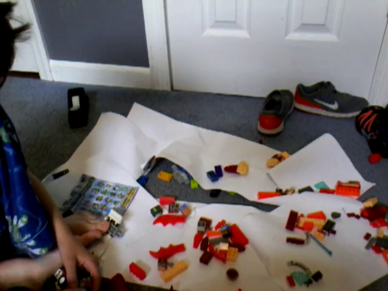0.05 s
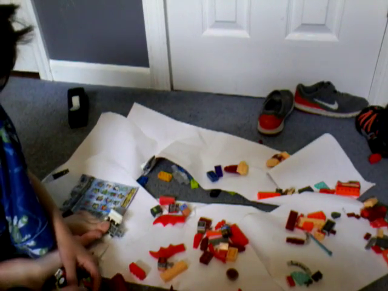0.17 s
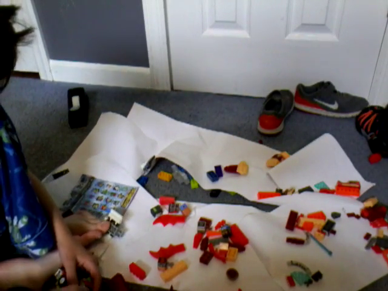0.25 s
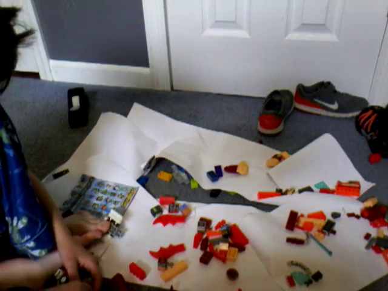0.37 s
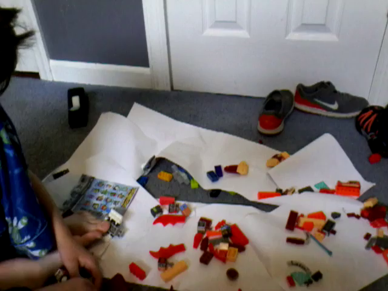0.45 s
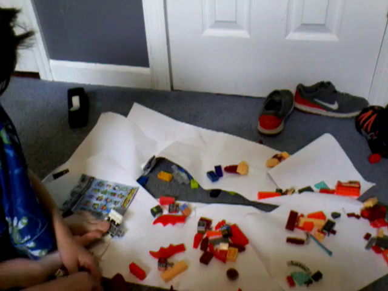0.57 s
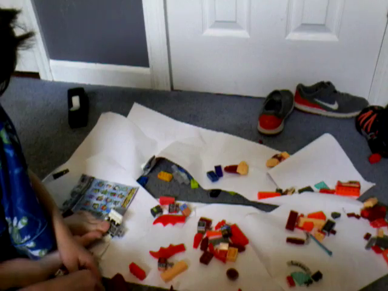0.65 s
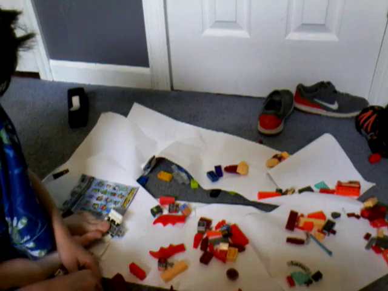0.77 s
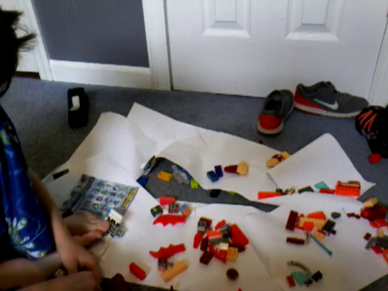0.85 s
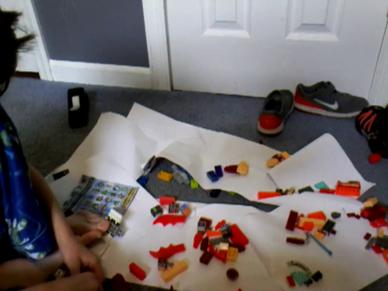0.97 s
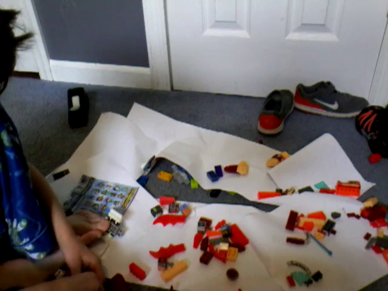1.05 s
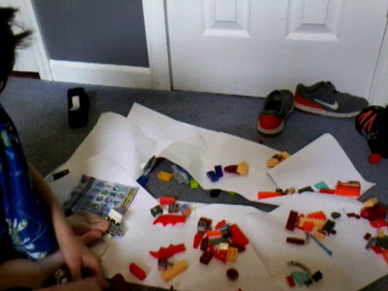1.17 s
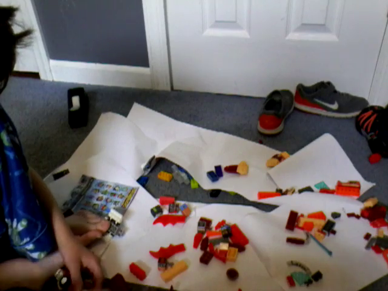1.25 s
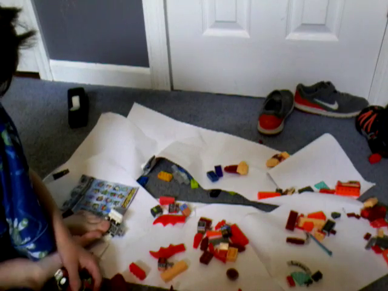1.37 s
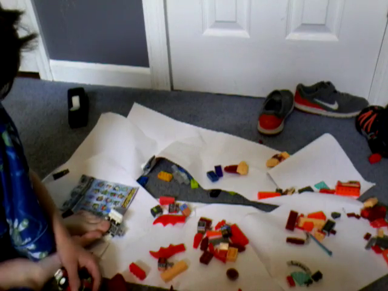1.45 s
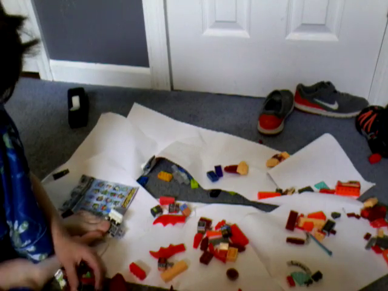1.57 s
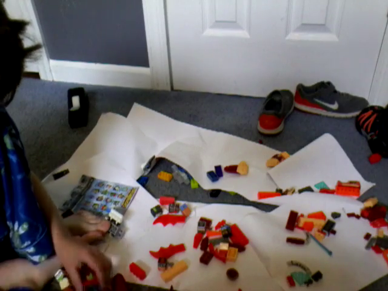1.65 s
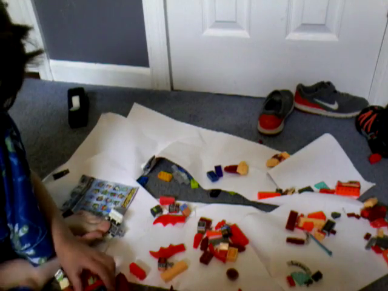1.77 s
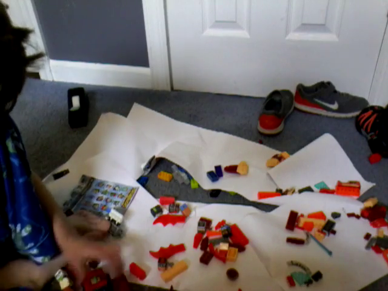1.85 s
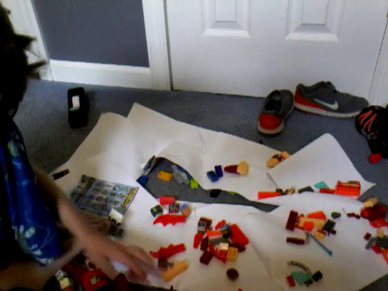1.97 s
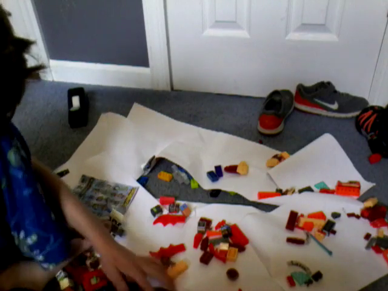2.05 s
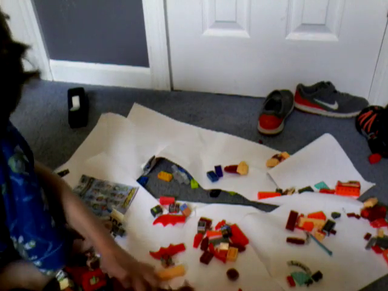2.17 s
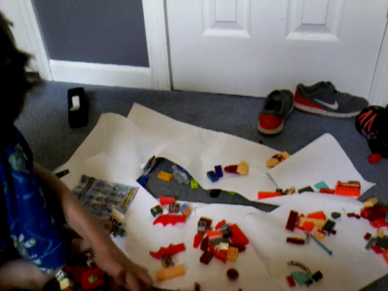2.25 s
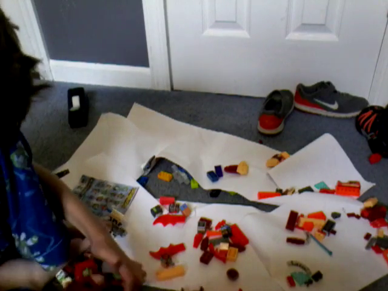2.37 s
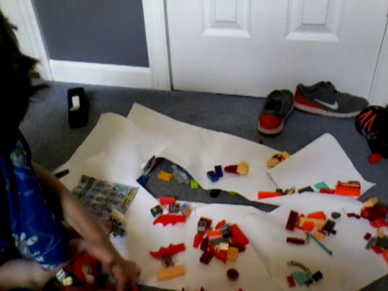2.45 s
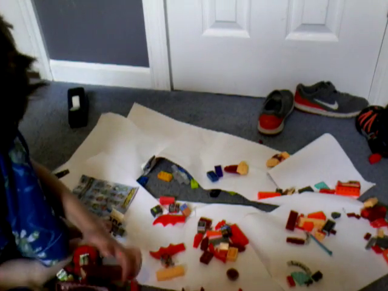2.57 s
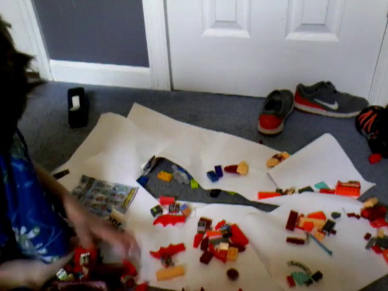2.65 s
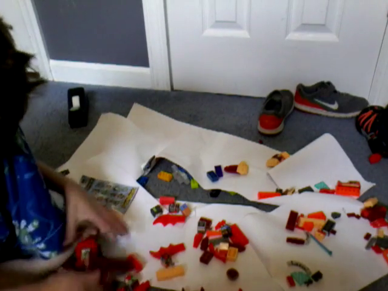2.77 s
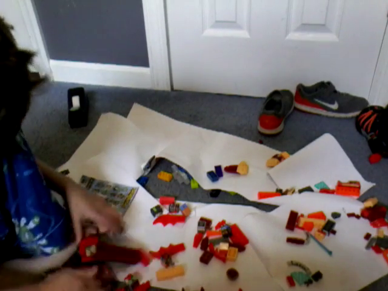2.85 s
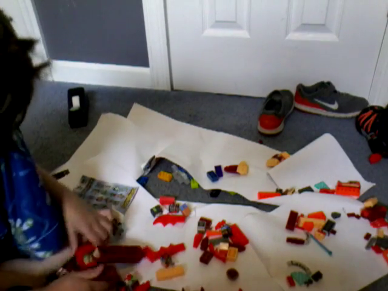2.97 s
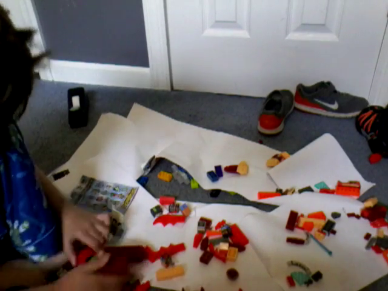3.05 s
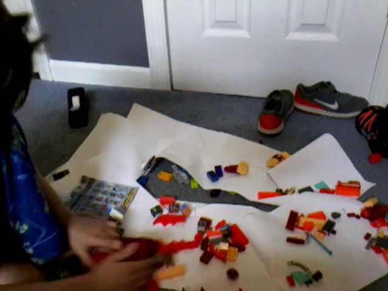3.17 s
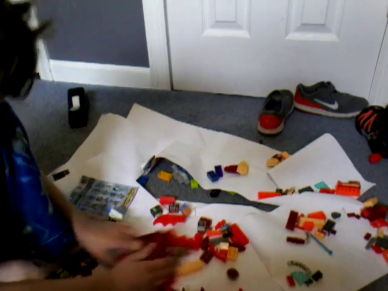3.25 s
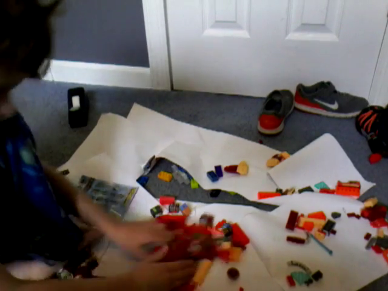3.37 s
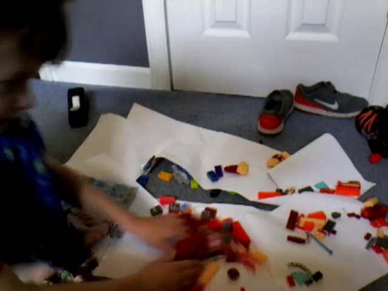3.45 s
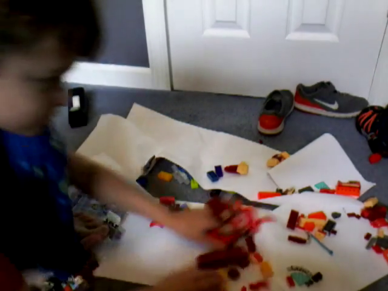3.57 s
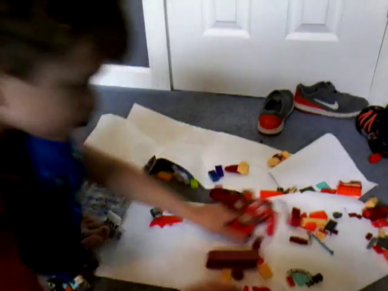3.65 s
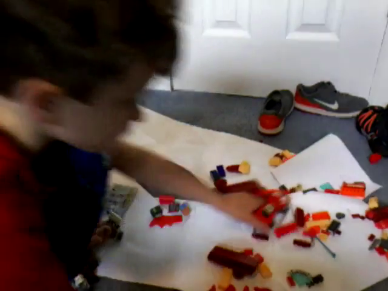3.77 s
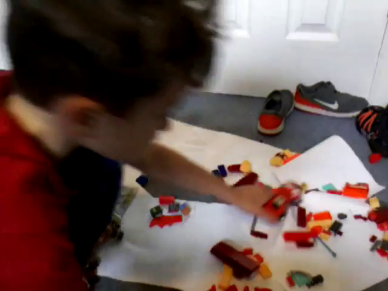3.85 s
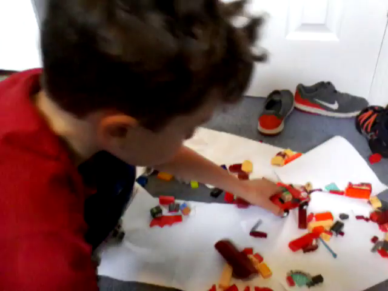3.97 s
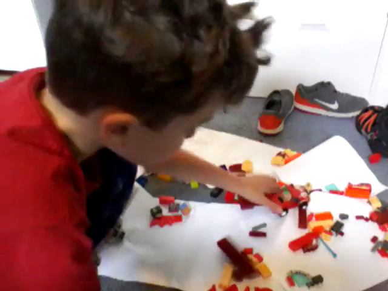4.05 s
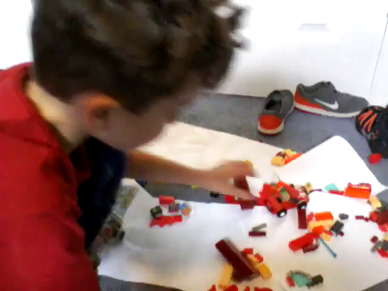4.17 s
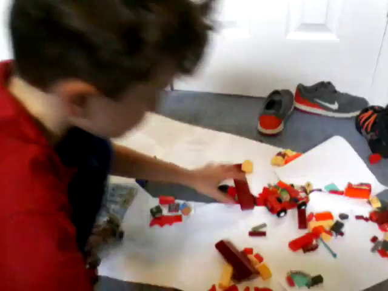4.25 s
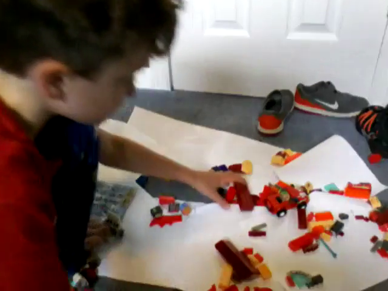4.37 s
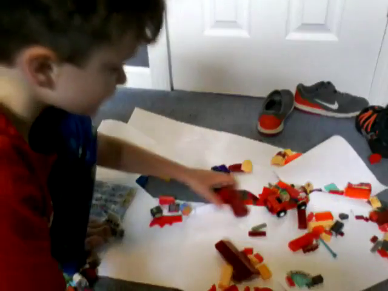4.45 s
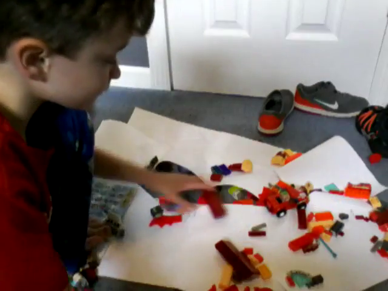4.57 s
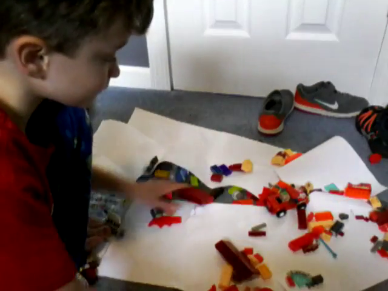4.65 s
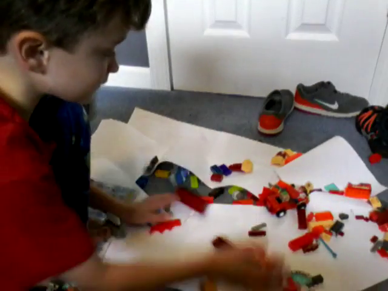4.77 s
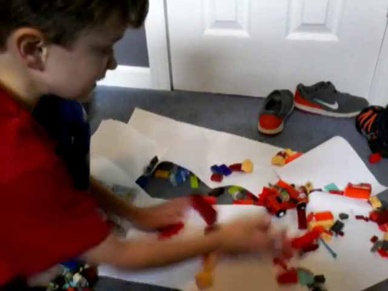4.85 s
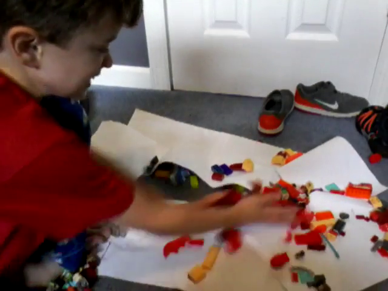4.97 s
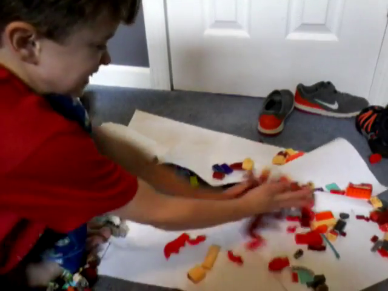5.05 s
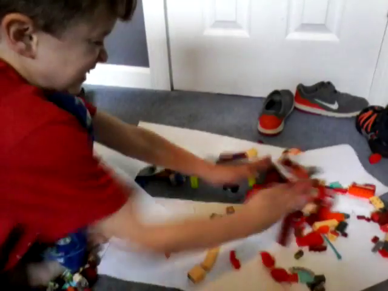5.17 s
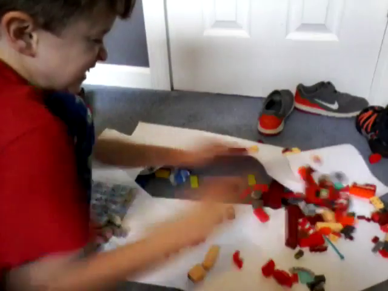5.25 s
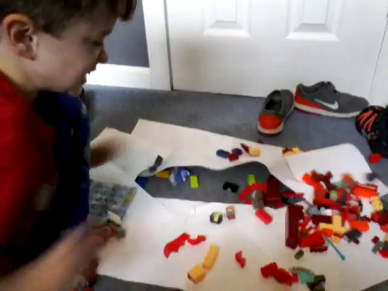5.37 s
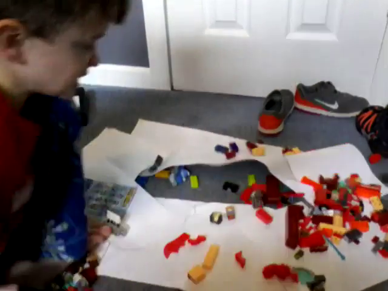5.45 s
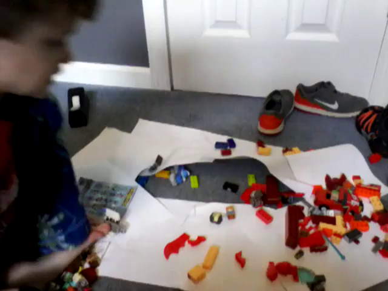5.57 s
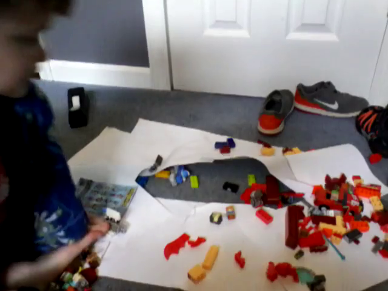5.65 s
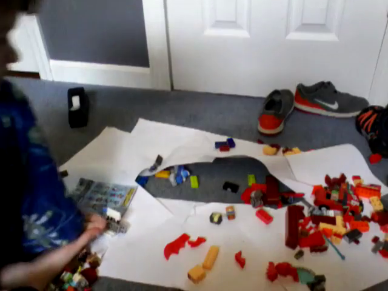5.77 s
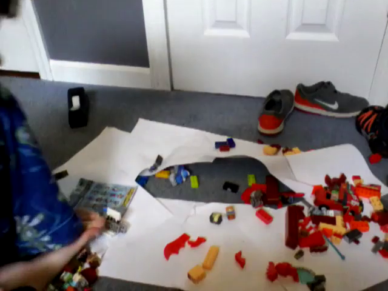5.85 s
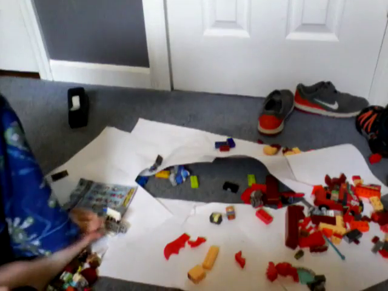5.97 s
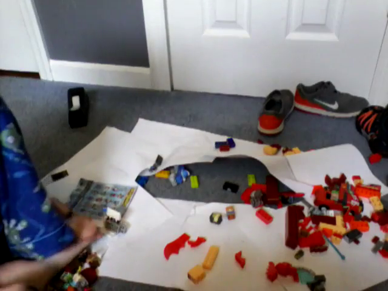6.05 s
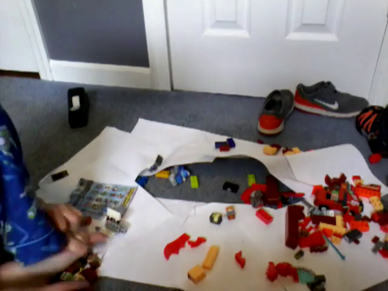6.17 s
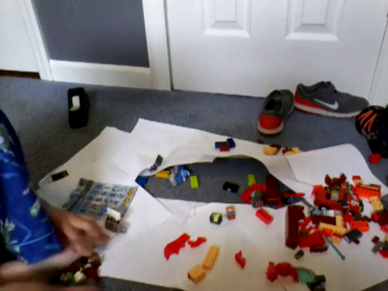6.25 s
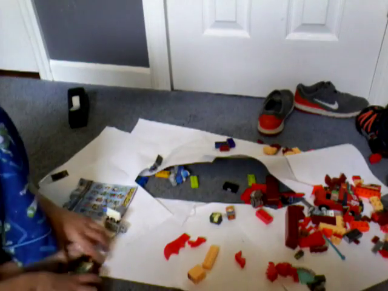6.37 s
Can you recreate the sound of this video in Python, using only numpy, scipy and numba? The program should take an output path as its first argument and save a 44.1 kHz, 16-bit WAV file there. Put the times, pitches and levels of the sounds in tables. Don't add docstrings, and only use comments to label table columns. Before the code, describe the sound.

In a small furnished bedroom, a faint low hum and slight paper rustle, with one sharp plastic click at about one second. Then a hand digs into a heap of small hollow plastic bricks, raking, pushing and scooping them over paper on carpet in dense, bright, uneven clatter for nearly four seconds. It thins into scattered soft ticks and small taps. Close, cheap little microphone, strong upper mids, little bass.

```python
import sys
import numpy as np
from scipy import signal
from scipy.fft import rfft, irfft
from scipy.io import wavfile
from scipy.ndimage import uniform_filter1d, minimum_filter1d
from numba import njit

SR = 44100
rng = np.random.default_rng(int(sys.argv[2]) if len(sys.argv) > 2 else 0)


def amplitude_ratio(level_db):
    exponent = np.asarray(level_db, float) / 20
    return 10 ** exponent


def store_pcm(level_fs):
    pcm = np.round(np.clip(level_fs, -1, 1) * 32767).astype(np.int16)
    wavfile.write(sys.argv[1], SR, np.atleast_2d(pcm).T)


N = 282681


def unit(x):
    return x / np.sqrt(np.mean(x ** 2))


def curves(table):
    s, *columns = np.transpose(table)
    return [np.interp(np.arange(N) / SR, s, column) for column in columns]


def shape_db(points, hz):
    f, db = np.transpose(points)
    return np.interp(np.log(np.maximum(hz, 1)), np.log(f), db)


def coloured(x, points):
    gain = amplitude_ratio(shape_db(points, np.fft.rfftfreq(len(x), 1 / SR)))
    return unit(irfft(rfft(x) * gain, len(x)))


def walk(rate_hz):
    hold = int(SR / rate_hz)
    steps = np.repeat(rng.standard_normal(N // hold + 1), hold)
    return uniform_filter1d(uniform_filter1d(steps, hold), hold)[:N]


@njit
def ring(start, hz, t60_s, size, rise_s):
    out, rise = np.zeros(N), np.exp(-1 / (rise_s * SR))
    for k in range(len(start)):
        turn = np.exp(2j * np.pi * hz[k] / SR - np.log(1000) / (t60_s[k] * SR))
        z, unpushed = size[k] + 0j, 1.
        for i in range(int(start[k]), min(N, int(start[k] + .7 * t60_s[k] * SR))):
            out[i] += z.imag * (1 - unpushed) ** 2
            z, unpushed = z * turn, unpushed * rise
    return out


# mode_hz, width_hz, level_db
BRICK_MODES = [(1782, 40, 5.5), (2500, 120, -13), (2873, 40, 10), (3300, 77, 7), (3830, 320, 5.5),
               (4420, 110, 11.5), (5020, 72, 6), (6380, 130, 1.5), (6700, 120, 2.5), (7150, 110, 5.5),
               (8316, 98, 7)]
# freq_hz, density_db_per_hz
TICK_SHAPE = [(300, -52), (500, -39.5), (1500, -30), (1800, -19), (2600, -10), (2900, -7.5), (4300, -3.5),
              (5500, -3.5), (7200, -13.5), (9200, -20), (12000, -22), (15000, -35)]
LONG_IN_S, LONG_OUT_S, LONG_IN_DB, LONG_AWAY_DB = 1.74, 2.95, 4, -10
GRIP_DB, GRIP_UNTIL_S = 20, 1.685
DEEP_RING_DB_PER_OCTAVE = 2.5
SPREAD_S = .0003


def contacts(s, db, bright_db, low_db, own_hz, own_db, tick_db, scatter_db, rise_s, low_hz, count, size):
    pick = rng.integers(len(BRICK_MODES), size=(len(s), count))
    pick[::3, 0], pick[1::7, 0] = 0, 2
    mode_hz, mode_width_hz, mode_db = np.transpose(BRICK_MODES)[:, pick]
    long_here = (s > LONG_IN_S) & (s < LONG_OUT_S)
    mode_db = mode_db + (pick == 0) * np.where(long_here, LONG_IN_DB, LONG_AWAY_DB)[:, None]
    mode_db -= GRIP_DB * (s < GRIP_UNTIL_S)[:, None]
    chance = rng.standard_normal((len(s), 3, count + size))

    spread_hz = np.geomspace(low_hz, 14000, size) / 2 + np.linspace(low_hz, 14000, size) / 2
    spread_hz = spread_hz + 0 * s[:, None]
    mode_detune = np.where(pick % 2 + pick // 3, .04, .012)
    detune = np.c_[mode_detune, 0 * spread_hz + 1.2 / size]
    hz = np.c_[mode_hz, spread_hz] * (1 + detune * chance[:, 0])
    hz = np.clip(hz, 300, .4 * SR)

    gain_db = np.c_[mode_db, 0 * spread_hz + tick_db]
    gain_db = gain_db + scatter_db * chance[:, 2] + shape_db(TICK_SHAPE, hz)
    gain_db += bright_db[:, None] * np.clip(np.log2(hz / 5000) / .5, 0, 1)
    gain_db += low_db[:, None] * np.clip(np.log2(3200 / hz) / 1.24, 0, 1)
    own_gain_db = gain_db.max(axis=1) + own_db + DEEP_RING_DB_PER_OCTAVE * np.log2(4000 / own_hz)

    width_hz = np.c_[mode_width_hz, 180 + .06 * spread_hz] * amplitude_ratio(2.5 * chance[:, 1])
    width_hz = np.c_[width_hz, 65 + .03 * own_hz]
    hz = np.c_[hz, own_hz]
    swing = amplitude_ratio(np.c_[gain_db, own_gain_db]) * width_hz * np.sign(rng.standard_normal(hz.shape))
    swing *= (amplitude_ratio(db) / np.sqrt(np.sum(swing ** 2, axis=1)))[:, None]
    start = (s[:, None] + SPREAD_S * rng.exponential(size=hz.shape)) * SR
    t60_s = np.log(1000) / np.pi / width_hz
    return ring(start.ravel(), hz.ravel(), t60_s.ravel(), swing.ravel(), rise_s)


# start_s, peak_db, ring_hz, bright_db, thud_db
TAPS = [(0.543, -26, 4300, -22, -14), (1.0662, 0.5, 4860, -12.5, -26), (1.0664, -23, 520, -42, 1),
        (1.0668, -10, 7400, -21, -25), (1.504, -27.5, 5200, -19, -19), (1.521, -20.5, 583, -34, 9.5),
        (1.629, -19.5, 4230, -34, 0), (1.668, -18, 3250, -46, -21), (5.566, -19, 4200, -46, -22),
        (5.633, -19, 3800, -29, 17), (5.677, -20, 4740, -23, 15), (5.72, -23.5, 5900, -13, -22),
        (5.814, -25, 4520, -16, 10), (5.825, -23.5, 6600, -15.5, -17.5), (6.157, -37, 4500, -22.5, -28),
        (6.218, -19.5, 5760, -12, -14), (6.274, -30, 2510, -23, 14), (6.309, -23, 3930, -20, 12),
        (6.327, -23, 4400, -9, -24), (6.344, -21, 4640, -6, -37), (6.375, -27, 4660, -27, -25.5),
        (6.388, -22, 6700, -28, -21), (6.404, -23, 4340, -27.5, -18)]
# start_s, peak_db, ring_hz, bright_db
RAKE_KNOCKS = [(1.6896, -11.5, 2900, -18.5), (1.7032, -8.5, 4230, -21), (1.7522, -12, 4230, -21),
               (1.7604, -12.5, 1760, -6), (1.788, -15, 1750, -26), (1.774, -6.5, 4320, -38),
               (1.8021, -4.5, 3980, -19), (1.9112, -27.5, 4530, 2), (2.0253, -25.5, 3830, 0),
               (2.0572, -4.5, 3500, -37), (2.0901, -2.5, 4360, -40), (2.0945, -4, 1896, -31),
               (2.1008, -2, 4150, -3), (2.122, -1, 4570, -21), (2.1836, 2, 4190, -26),
               (2.2353, -1, 3820, -37), (2.2539, 4, 3840, -22), (2.3337, -2, 4540, -26.5),
               (2.3518, -1, 3830, -35), (2.3643, 4.5, 3760, -20), (2.382, -2.5, 3900, -20.5),
               (2.4053, 2, 4167, -16.5), (2.506, -6.5, 4300, -36), (2.5293, -2, 4130, -20),
               (2.553, -0.5, 3030, -17), (2.6202, -1.5, 4160, -18), (2.689, -2.5, 3830, -18),
               (2.7911, -11, 3860, -13), (2.826, -10.5, 3370, -20), (2.879, -12, 4600, -31),
               (2.892, -2.5, 4400, -21), (2.9298, -6.5, 3700, -14.5)]
# start_s, peak_db, ring_hz, bright_db
PUSH_KNOCKS = [(3.0087, -1.5, 8140, 1), (3.042, -8.5, 4120, -32), (3.0869, -3.5, 2940, -46),
               (3.1245, -3.5, 4180, -42), (3.16, -7, 4520, -22), (3.1836, -2.5, 4140, -19),
               (3.211, -6, 4620, -13), (3.24, -6, 5230, -16), (3.279, -3.5, 4500, -7.5),
               (3.3377, -6, 4370, -28), (3.3611, 0.5, 4260, -28), (3.4, -4.5, 3980, -15),
               (3.415, 4, 4750, -5), (3.4489, 4.5, 6120, -21), (3.4722, 2.5, 6840, -9),
               (3.492, 3.5, 4220, 29), (3.52, 3, 4480, 9), (3.5621, 4, 4730, 18), (3.6399, 7, 4450, -34),
               (3.6646, -1.5, 4320, 7), (3.6779, 5.5, 4400, -7), (3.703, 1.5, 4080, -9),
               (3.7398, 3, 5600, -21), (3.7889, 3, 4280, -30), (3.8398, -4, 4340, -29),
               (3.8834, 4, 4510, 8), (3.9986, -4, 4280, -6), (4.103, -16, 4200, -3),
               (4.1585, -7, 4170, -49), (4.257, -14.5, 4460, 6)]
# start_s, peak_db, ring_hz, bright_db
SCOOP_KNOCKS = [(4.383, -4, 4500, -38), (4.3973, 1, 4450, -25), (4.5132, -4, 4400, -25),
                (4.5324, 2.5, 4440, -13.5), (4.577, 4, 4010, -9), (4.6518, -5, 6300, -18),
                (4.6737, -1, 4500, -22), (4.725, -9, 4630, -11), (4.7492, -1.5, 4400, -9),
                (4.7658, -6.5, 4580, -17), (4.779, 4, 4450, 9), (4.809, 2, 3920, -14),
                (4.8614, 8, 5020, -15.5), (4.8847, -2, 4300, -25.5), (4.925, 1, 4165, -38),
                (4.9684, 3, 4030, -30), (4.995, 1.5, 3700, -14), (5.034, 5, 3720, -14.5),
                (5.0726, 2, 3660, -18), (5.0973, 0, 4040, -27.5), (5.174, -3.5, 4080, -25.5),
                (5.203, -0.5, 3940, -18), (5.2706, -5, 3320, -33), (5.3299, 0.5, 3820, -5.5),
                (5.3377, -2, 3850, -14), (5.3885, -2, 4130, -14), (5.4774, -11.5, 4460, -14)]
THUD_DB, THUD_PER_DB, THUD_SCATTER_DB = -13.5, -1.3, 1
THUD_PER_DRAG = 0.18
HELD_DB, HELD_UNTIL_S = 8.0, 1.6


def knocks(drag_db):
    heap = np.array(RAKE_KNOCKS + PUSH_KNOCKS + SCOOP_KNOCKS)
    thud_db = THUD_DB + THUD_PER_DB * heap[:, 1] + THUD_SCATTER_DB * rng.standard_normal(len(heap))
    thud_db += THUD_PER_DRAG * (drag_db[(heap[:, 0] * SR).astype(int)] + 23)
    heap = np.c_[heap, thud_db] + [0, 3.0, 0, 0, 0]
    s, db, hz, bright_db, low_db = np.r_[TAPS, heap].T
    held_db = HELD_DB * (s < HELD_UNTIL_S)
    lags_s = np.cumsum(.0016 * amplitude_ratio(3.7 * rng.standard_normal((len(s), 2))), axis=1)
    out = contacts(s, db - 2.5, bright_db + 21.5, low_db + 17.0, hz, own_db=7.5,
                   tick_db=held_db[:, None] - 3.0, scatter_db=1.5, rise_s=.0001,
                   low_hz=560, count=2, size=36)
    for lag_s, softer_db in zip(lags_s.T, (8.0, 11.0)):
        out += contacts(s + lag_s, db - softer_db - held_db / 2, bright_db + 25.5, low_db + 29, hz,
                        own_db=-0.5 - held_db / 2, tick_db=2 * held_db[:, None] - 21.5,
                        scatter_db=5.0, rise_s=0.000069, low_hz=900, count=3, size=20)
    return out


# start_s, peak_db, ring_hz, bright_db
LESSER_TICKS = [(1.7108, -17, 4150, -20), (1.717, -15.5, 4100, -10), (1.7859, -9, 2910, -26),
                (1.8576, -34, 3850, -17), (1.8724, -38, 3830, -19), (1.9188, -30, 3700, -23),
                (1.927, -36, 4400, -26), (2.1362, -6, 3700, -2), (2.1651, -11.5, 6000, -15),
                (2.176, -6, 4500, -11), (2.1952, -3.5, 4400, -13), (2.2, -9.5, 4160, -30),
                (2.2113, -5.5, 4270, -16), (2.2623, 0.5, 3850, -25), (2.2705, -11.5, 4920, -26),
                (2.2777, -4.5, 3800, -26), (2.3122, -5, 3880, -21), (2.3224, -2.5, 3750, -29),
                (2.355, -4.5, 3720, -21), (2.4164, -0.5, 3680, -28), (2.4353, -8.5, 3450, -13),
                (2.4437, -10, 5000, -16), (2.4526, -12, 4800, -14), (2.4673, -18, 4800, -15),
                (2.48, -22, 4130, -23), (2.497, -4.5, 3250, -22), (2.5626, -6.5, 5130, -16),
                (2.5908, -22, 2880, -12), (2.639, -1.5, 5000, -43), (2.6733, -13, 5300, -25),
                (2.7274, -22, 3330, -20), (2.749, -21, 2850, -14), (2.761, -15.5, 3080, -15),
                (2.797, -12.5, 3220, -21), (2.805, -16, 3350, -29), (2.8417, -17, 3280, -28),
                (2.8997, -6, 3370, -26), (2.9473, -8.5, 3230, -20), (2.9694, -18.5, 3500, -24),
                (3.023, -13, 4140, -26), (3.0534, -13, 3600, -32), (3.1493, -15, 2800, -30),
                (3.1726, -12, 3700, -21), (3.218, -13, 3300, -19), (3.232, -19, 4460, -18),
                (3.267, -7.5, 3500, -21), (3.2895, -11, 4570, -14),
                (3.323, -14, 4400, -21), (3.372, -6, 4500, -12), (3.407, -7, 4230, -25),
              (3.4595, 1, 5600, -5), (3.528, -5, 4300, -1), (3.5351, -0.5, 4400, -18.5),
              (3.5434, -2.5, 4390, -18), (3.5723, -3, 4170, -4), (3.5857, 0.5, 4000, -12),
              (3.603, -4, 4040, 0), (3.6152, -1, 4230, -12), (3.6826, -5, 4400, -18),
              (3.727, -5.5, 4060, 3), (3.757, -1, 5860, -16), (3.799, -4, 4280, -3),
              (3.817, -5.5, 4130, -16), (3.829, -3, 4500, -23), (3.8546, -6.5, 2860, -13),
              (3.87, -8, 3730, -22), (3.9071, -7.5, 2070, -30), (3.926, -10, 4420, -5),
              (3.935, -5.5, 8530, 3), (3.9486, -7.5, 4130, -6), (3.9578, -8, 8480, -14),
              (3.967, -6, 4300, -19), (3.974, -14, 3600, -15), (4.02, -10.5, 3760, -23),
              (4.0312, -15.5, 1760, -21), (4.0461, -20, 3430, -24), (4.0557, -9, 6500, -31),
              (4.0648, -17.5, 3280, -19), (4.123, -14.5, 6030, -4), (4.1371, -15, 3170, -29),
              (4.2063, -40, 5070, -20), (4.2179, -26, 4500, -25), (4.2696, -18, 6250, -1),
              (4.2995, -28, 4410, -9), (4.3066, -30, 4300, -12), (4.3146, -26, 3120, -9),
              (4.326, -29, 4060, -20), (4.335, -21, 3600, -27), (4.3437, -19, 6400, 1),
              (4.4056, -29, 4200, -18.5), (4.446, -19, 4600, -27), (4.471, -21.5, 2730, -33),
              (4.4809, -27, 3000, -18), (4.5837, -1, 2850, -22), (4.6818, -10.5, 5080, -21.5),
                (4.6888, -15, 3500, -21), (4.7966, -8, 6270, -14), (4.8187, -0.5, 3850, -24),
               (4.8291, -3.5, 4040, -10.5), (4.8369, -1, 4160, -3), (4.8692, -9, 4870, -28),
               (4.894, 1, 4400, -7), (4.9352, -2, 4030, -21), (5.0855, 0.5, 2930, -16),
               (5.122, -6.5, 2880, -14), (5.1287, -12, 2960, -18), (5.1429, -12, 3760, -19),
               (5.161, -10, 4520, -20), (5.1873, -11, 4300, -26), (5.2223, -19, 4000, -20),
               (5.236, -14, 3300, -21), (5.263, -17, 4120, -31), (5.282, -9, 4070, -29),
               (5.2971, -9, 3630, -13), (5.3217, -5.5, 3120, -23), (5.3434, -3, 6400, -23),
               (5.366, -3.5, 6560, -13), (5.3744, -1.5, 4470, -23), (5.4103, -10, 4500, -18),
               (5.4228, -8, 6160, -17), (5.4346, -12, 4300, -20), (5.4556, -30, 4300, -17),
               (5.465, -26, 3560, -9), (5.4994, -11.5, 5020, -10), (5.5126, -20, 4970, -17),
               (5.5233, -20, 5070, -23), (5.5357, -32, 5550, -14), (5.5762, -23.5, 4950, -22),
               (5.586, -27, 3860, -24), (5.6048, -36, 4850, -21), (5.61, -32, 4130, -19),
               (5.6186, -31, 4170, -19), (5.6467, -27, 2680, -20), (5.665, -25, 3730, -11),
               (5.6848, -36, 4830, -14), (5.735, -31, 6000, -22), (5.745, -35, 5960, -15),
               (5.762, -32, 4200, -18), (5.7776, -30, 3960, -23), (5.847, -41, 4600, -20),
               (5.862, -47.5, 2630, -19.5), (5.8727, -50, 2740, -17.5)]


def ticks(low_db):
    s, db, hz, bright_db = np.array(LESSER_TICKS).T
    low_db = low_db[(s * SR).astype(int)]
    rebound_s = s + .002 * amplitude_ratio(3.5 * rng.standard_normal(len(s)))
    first = contacts(s, db + 2.5, bright_db + 21.0, low_db + 15.5, hz, own_db=4.5, tick_db=-4.5,
                     scatter_db=3.0, rise_s=.0001, low_hz=1043, count=2, size=20)
    second = contacts(rebound_s, db - 2.5, bright_db + 24.0, low_db + 17.5, hz, own_db=8.7, tick_db=-4.5,
                      scatter_db=4.8, rise_s=.0001, low_hz=1300, count=2, size=10)
    return first + second


# start_s, clatter_db, drag_db
GRAB = [
    (1.6, -47.5, -15),
    (1.71, -31, -29),
    (1.74, -36, -21),
    (1.773, -8, -65),
    (1.81, -22.5, -28),
    (1.98, -65, 2),
]
# start_s, clatter_db, drag_db
RAKE = [
    (2.061, -31, -19),
    (2.108, -7.5, -22.5),
    (2.18, -11.5, -25),
    (2.28, -5.5, -29),
    (2.42, -11.5, -29.5),
    (2.59, -10.5, -27),
    (2.78, -26, -20),
    (2.91, -21, -16),
    (3.0, -33.5, -7.5),
]
# start_s, clatter_db, drag_db
PUSH = [
    (3.04, -29, -14.5),
    (3.25, -18.5, -13.5),
    (3.44, -19, -15.5),
    (3.49, -9.5, -21),
    (3.66, -8, -20.5),
    (3.78, -12.5, -16),
    (4.02, -14.5, -18.5),
    (4.12, -36, -3),
    (4.23, -35, -11.5),
]
# start_s, clatter_db, drag_db
SCOOP = [
    (4.399, -32, 5.5),
    (4.479, -22.5, -22),
    (4.71, -21, -14),
    (4.78, -14.5, -35.5),
    (4.839, -12, -15.5),
    (5.001, -6.5, -27.5),
    (5.43, -13, -15.5),
    (5.59, -29, -14),
    (5.98, -56, -9),
]
# start_s, clatter_db, drag_db
IDLE = [
    (0.0, -54.5, -13),
    (0.9, -72, -7.5),
    (1.1, -50.5, -4),
    (1.25, -55.5, -19),
    (4.372, -29, -11),
    (6.15, -48.5, -15),
    (6.41, -32.5, -16.5),
]


def hand():
    return curves(sorted(IDLE + GRAB + RAKE + PUSH + SCOOP))


JOLT_DB, JOLT_T60_S = -13.5, 0.11


def jolted(db):
    s, knock_db = np.array(RAKE_KNOCKS + PUSH_KNOCKS + SCOOP_KNOCKS)[:, :2].T
    power = np.zeros(N)
    power[(s * SR).astype(int)] = amplitude_ratio(2 * (knock_db + JOLT_DB))
    power = signal.lfilter([1], [1, -amplitude_ratio(-120 / JOLT_T60_S / SR)], power)
    return 10 * np.log10(power + amplitude_ratio(2 * db))


BUNCH_DB = 2.4
RAREST = .008


def clatter(db, bright_db, low_db, per_s=1500):
    chance = rng.random((int(per_s * N / SR), 3))
    s = chance[:, 0] * (N - 1) / SR
    at = (s * SR).astype(int)
    size_db = db[at] - 2.32 * np.log(chance[:, 1] + RAREST) + BUNCH_DB * walk(45)[at] - 7.0
    own_hz = 2600 * 2.357 ** chance[:, 2]
    return contacts(s, size_db, bright_db[at] + 13.0, low_db[at] + 23.0, own_hz, own_db=-3.6,
                    tick_db=-4.0, scatter_db=3.7, rise_s=.0001, low_hz=1500, count=2, size=6)


# freq_hz, density_db_per_hz
PAPER_SHAPE = [(71, -46), (120, -8.5), (396, -1), (729, -2), (1030, -1.5), (1380, 0), (2500, -1.5),
               (3250, -40), (5500, -120)]


def paper(db):
    crackle = rng.standard_normal(N) * amplitude_ratio(4.0 * walk(150) + 1.5 * walk(28))
    return amplitude_ratio(db - 2.5) * coloured(crackle, PAPER_SHAPE)


ROOM_T60_S, ROOM_DULL_T60_S, ROOM_DB = .2, .21, -4


def room(x, count=8):
    t, out = np.arange(int(.4 * SR)) / SR, np.zeros(N + SR)
    for part in np.array_split(np.arange(N), count):
        noise = rng.standard_normal(len(t))
        dull = signal.lfilter(*signal.butter(2, 5500, fs=SR), noise)
        tail = dull * amplitude_ratio(-60 * t / ROOM_DULL_T60_S) + (noise - dull) * amplitude_ratio(-60 * t / ROOM_T60_S)
        tail *= np.clip((t - .002) / 0.00052, 0, 1)
        tail /= np.sqrt(np.sum(tail ** 2))
        out[part[0]:part[-1] + len(t)] += signal.fftconvolve(x[part], tail)
    return out[:N] * amplitude_ratio(ROOM_DB)


# freq_hz, density_db_per_hz
AIR_SHAPE = [(22, -39), (107, -0.5), (148, -10), (240, -7.5), (297, -4), (537, -17.5), (2700, -31),
             (8810, -34.5), (13900, -31), (15500, -42.5)]
AIR_DB = -52
HUM_HZ, HUM_DB, OCTAVE_DB = 147, -63, -61
LOAD_S, LOAD_RISE_S, LOAD_HUM_DB, LOAD_OCTAVE_DB, LOAD_RUMBLE_DB = 1.0, .1, 11, 2, 2


def house():
    load = .5 + .5 * np.tanh((np.arange(N) / SR - LOAD_S) / LOAD_RISE_S)
    air = coloured(rng.standard_normal(N), AIR_SHAPE)
    bass = signal.lfilter(*signal.butter(1, 450, fs=SR), air)
    air = air + bass * (amplitude_ratio(LOAD_RUMBLE_DB * load + 1.1 * walk(4.8)) - 1)
    phase = 2 * np.pi * np.cumsum(HUM_HZ * (1 + 0.012 * walk(5.5))) / SR
    hum = amplitude_ratio(HUM_DB + LOAD_HUM_DB * load + 1.5 * walk(9.1)) * np.sin(phase)
    hum += amplitude_ratio(OCTAVE_DB + LOAD_OCTAVE_DB * load + 3.6 * walk(22)) * np.sin(2 * phase)
    return amplitude_ratio(AIR_DB) * air + hum


BRIGHT_DB, BRIGHT_PER_DRAG = -5.5, 0.16
BIG_DB, BIG_PER_DB = -16.5, -0.03


def scene():
    db, drag_db = hand()
    big_db = BIG_DB + BIG_PER_DB * (db + 23.5)
    heap = clatter(jolted(db), BRIGHT_DB + BRIGHT_PER_DRAG * (drag_db + 16.5), big_db)
    bricks = knocks(drag_db) + ticks(big_db) + heap
    bricks = signal.lfilter(*signal.butter(4, 400, "high", fs=SR), bricks)
    near = bricks + paper(db + drag_db)
    return (near + room(near) + house())[None]


# freq_hz, floor_db
WEAK_FLOOR = [(60, -19.5), (230, -21), (450, -23), (1300, -22), (1800, -42), (9000, -33), (10000, -18),
              (12000, -16.5), (14200, -17.5), (14900, 0)]


def drop_weak_lines(x, size=1024, count=16):
    lead = 2 * size - 725
    n, k = np.arange(2 * size), np.arange(size)
    basis = np.cos(np.pi / size * np.outer(n + .5 + size / 2, k + .5)) * np.sqrt(2 / size)
    basis *= signal.windows.kaiser_bessel_derived(2 * size, 4 * np.pi)[:, None]
    hops = np.pad(x, (lead, 3 * size - (lead + N) % size)).reshape(-1, size)
    lines = np.c_[hops[:-1], hops[1:]] @ basis
    hz = (k + .5) * SR / 2 / size

    mids = np.sqrt(np.mean(lines[:, (hz > 2500) & (hz < 6000)] ** 2, axis=1))
    mids = np.exp(uniform_filter1d(np.log(mids + 1e-9), size=7, origin=1))
    own = .5 * (hz > 600)
    near = np.sqrt(own * lines ** 2 + (1 - own) * uniform_filter1d(lines ** 2, size=9, axis=1))
    luck_db = np.repeat(rng.standard_normal((len(lines), size // count)), count, axis=1)
    luck_db = luck_db * np.clip(hz / 2000, 1.5, 4.5)
    keep = near > mids[:, None] * amplitude_ratio(shape_db(WEAK_FLOOR, hz) + luck_db)

    power = np.mean(hops.reshape(len(hops), 8, -1) ** 2, axis=2).ravel() + 1e-12
    jump = power / np.roll(uniform_filter1d(power, size=5, origin=2), 1)
    no_attack = minimum_filter1d(1. * (jump < 14), size=7, origin=3)
    no_blow = minimum_filter1d(1. * (jump < 400), size=41, origin=20)
    spared = np.repeat(1 - no_attack * no_blow, size // 8)[lead:lead + N]

    frames = (lines * keep) @ basis.T
    hops[:-1], hops[-1] = frames[:, :size], 0
    hops[1:] += frames[:, size:]
    kept = hops.ravel()[lead:lead + N]
    band = signal.butter(9, (600, 14400), "band", fs=SR, output="sos")
    return kept + uniform_filter1d(spared, size=64) * signal.sosfilt(band, x - kept)


def roll_off(x):
    return signal.sosfilt(signal.butter(12, 15660, fs=SR, output="sos"), x)


MIC_HZ, MIC_WIDTH_HZ, MIC_DB = 4400, 960, -3


def record(dry):
    port = signal.lfilter(*signal.iirpeak(MIC_HZ, MIC_HZ / MIC_WIDTH_HZ, fs=SR), dry[0])
    heard = amplitude_ratio(-2.5) * (dry[0] + amplitude_ratio(MIC_DB) * port)
    excess = .88 * np.tanh(heard / .88) - heard
    rounded = heard + signal.lfilter(*signal.butter(2, 1200, "high", fs=SR), excess)
    mix = drop_weak_lines(rounded)[None]
    return roll_off(mix)


dry = scene()
out = record(dry)
store_pcm(out)
```